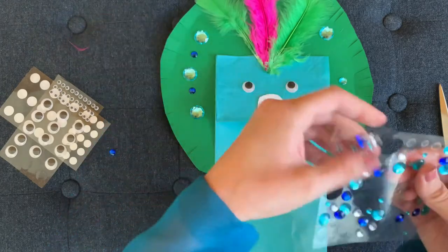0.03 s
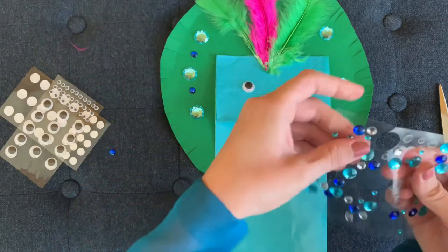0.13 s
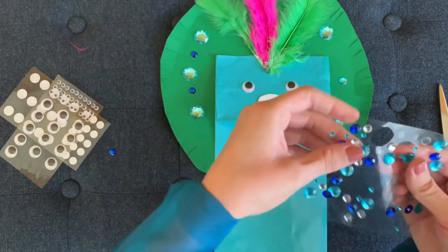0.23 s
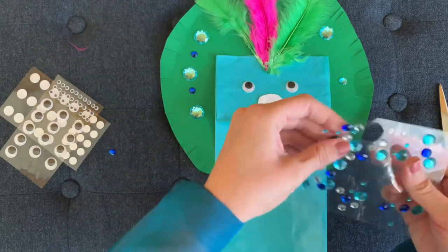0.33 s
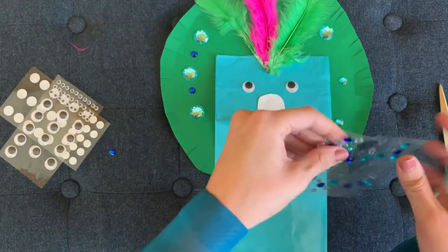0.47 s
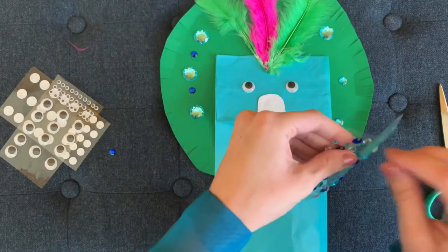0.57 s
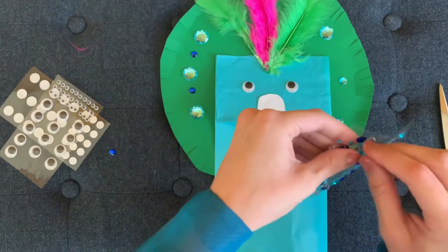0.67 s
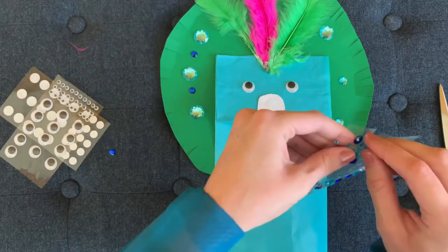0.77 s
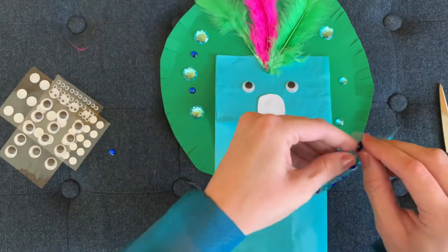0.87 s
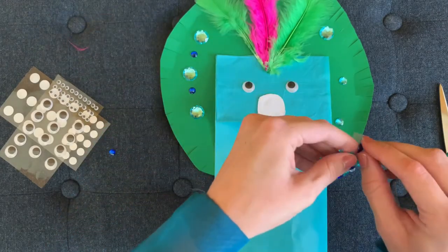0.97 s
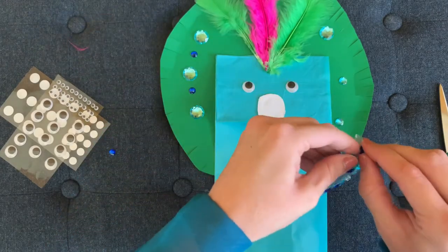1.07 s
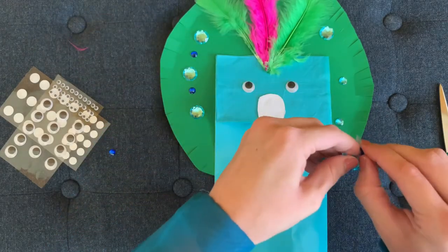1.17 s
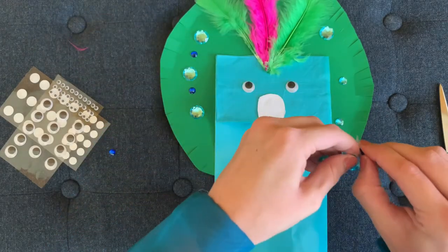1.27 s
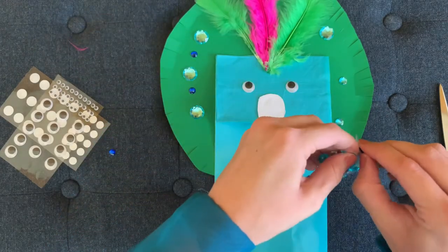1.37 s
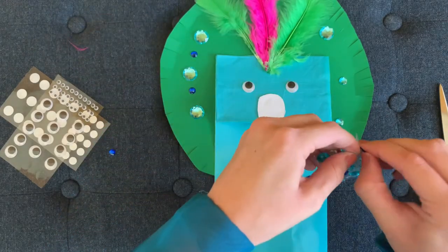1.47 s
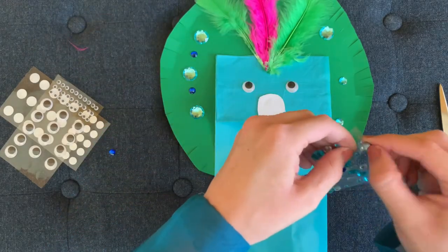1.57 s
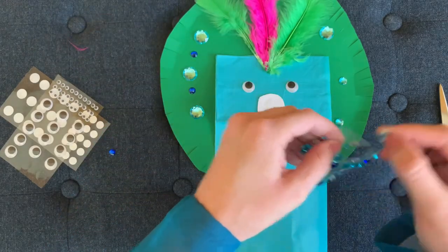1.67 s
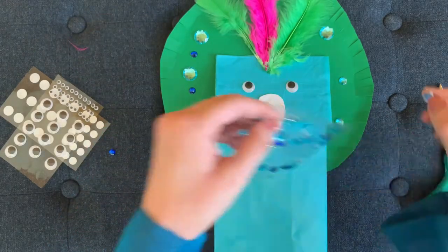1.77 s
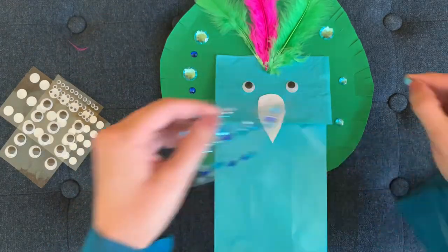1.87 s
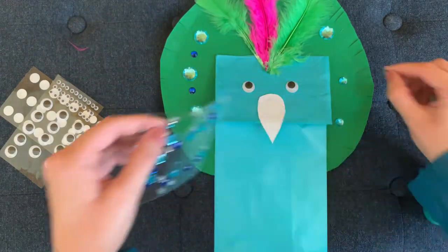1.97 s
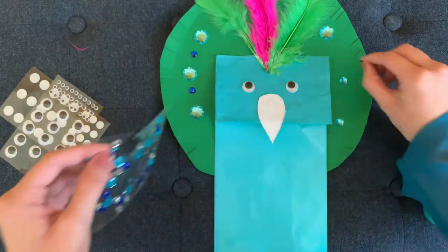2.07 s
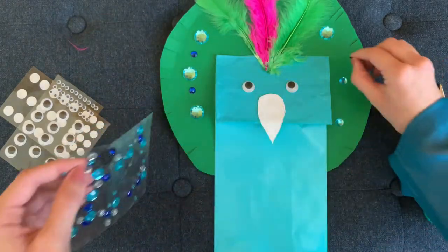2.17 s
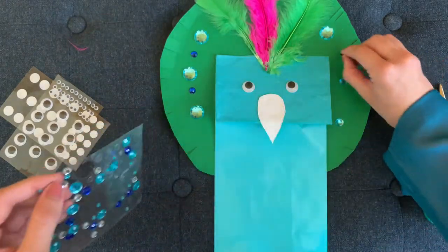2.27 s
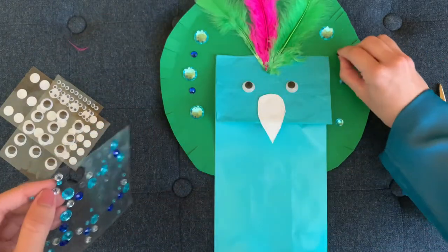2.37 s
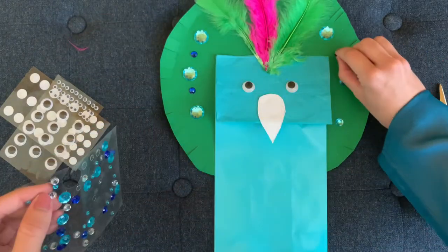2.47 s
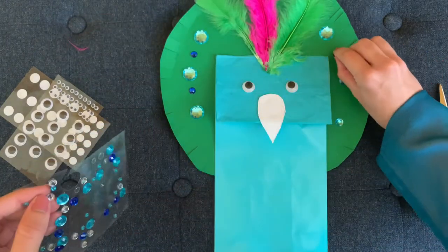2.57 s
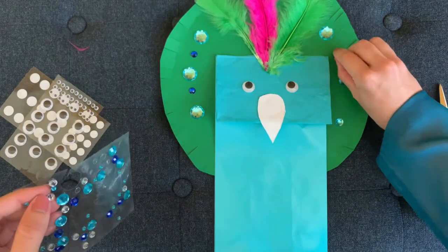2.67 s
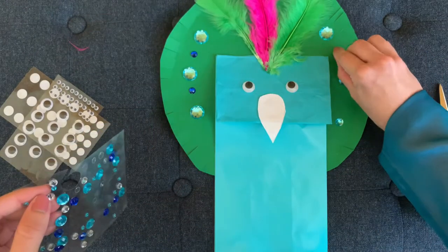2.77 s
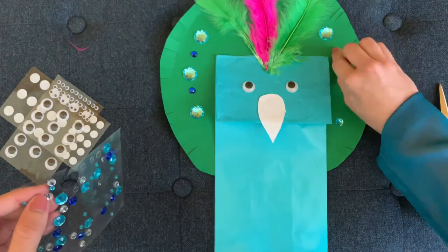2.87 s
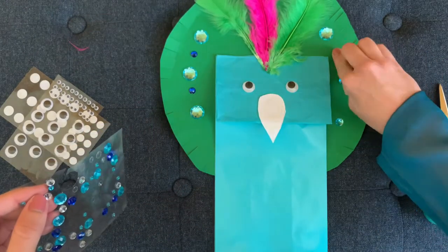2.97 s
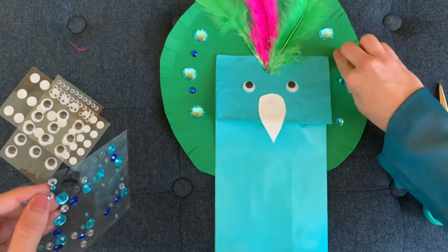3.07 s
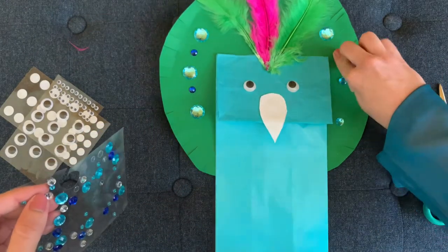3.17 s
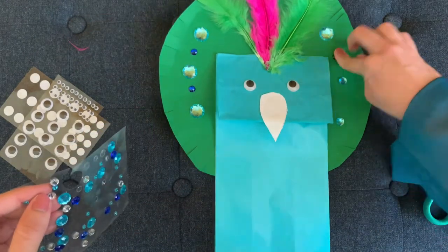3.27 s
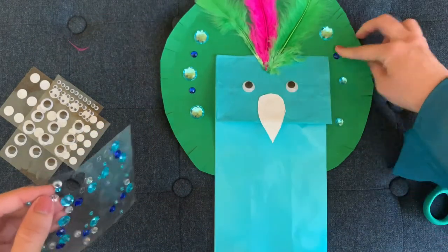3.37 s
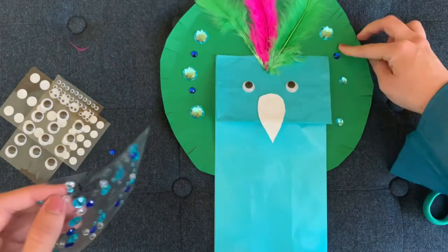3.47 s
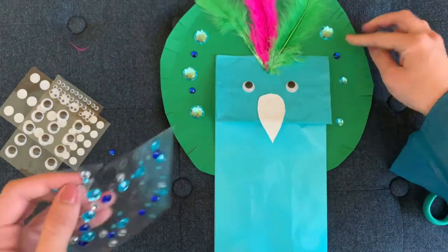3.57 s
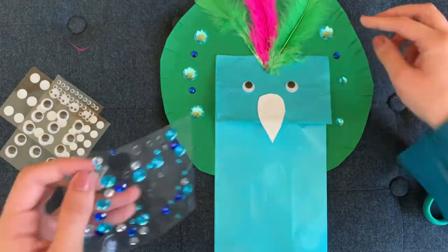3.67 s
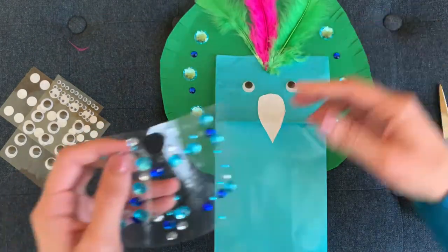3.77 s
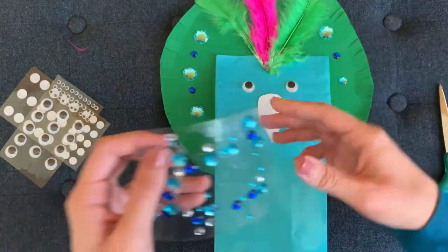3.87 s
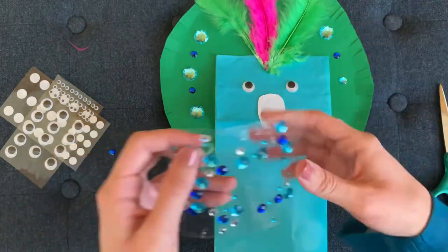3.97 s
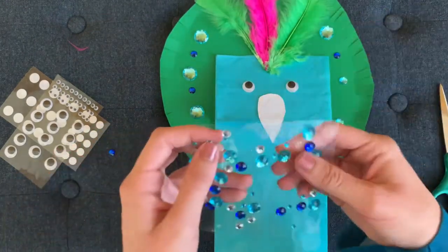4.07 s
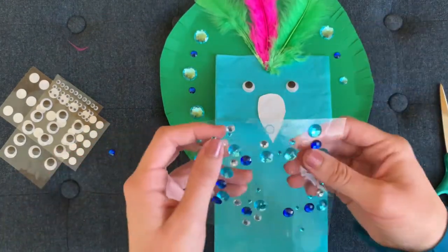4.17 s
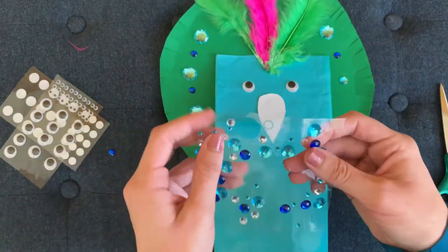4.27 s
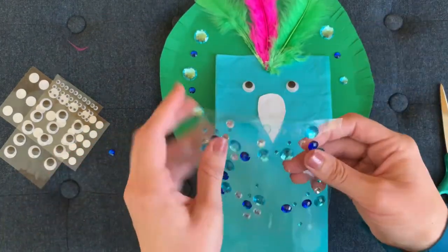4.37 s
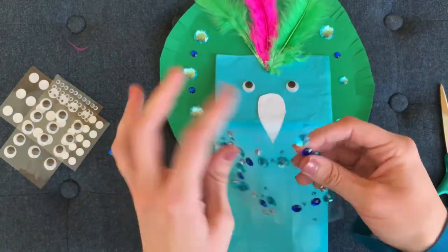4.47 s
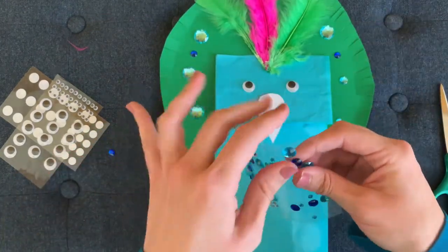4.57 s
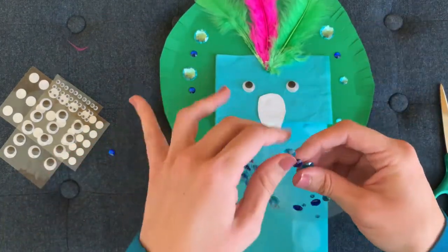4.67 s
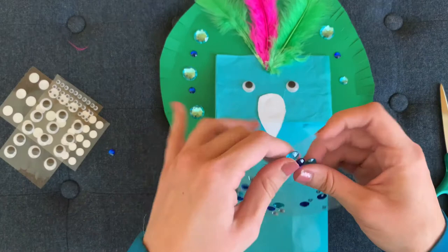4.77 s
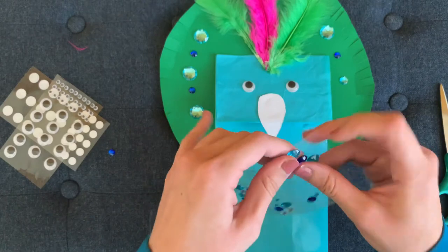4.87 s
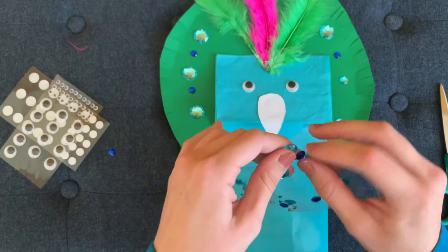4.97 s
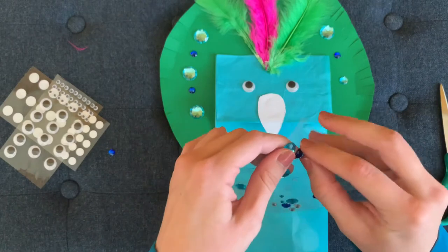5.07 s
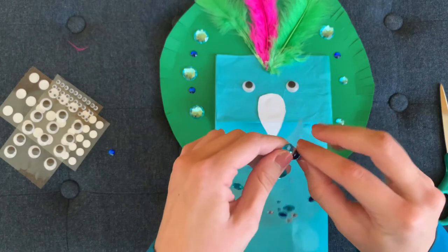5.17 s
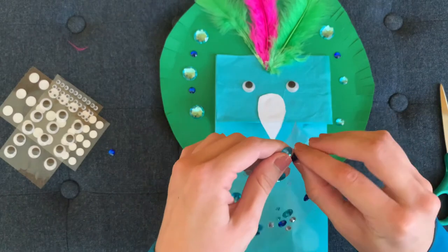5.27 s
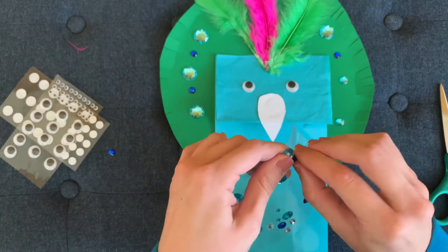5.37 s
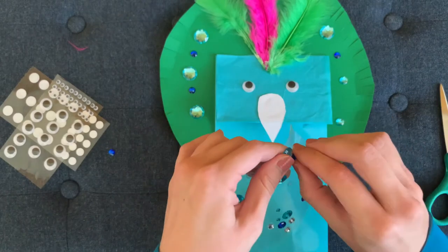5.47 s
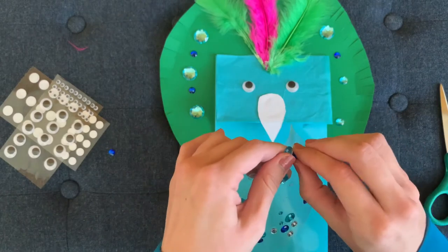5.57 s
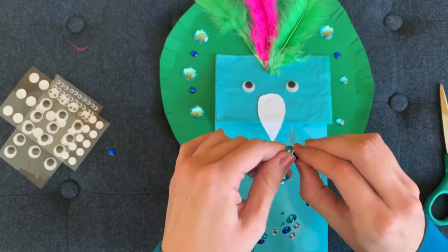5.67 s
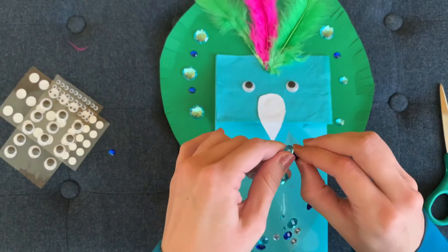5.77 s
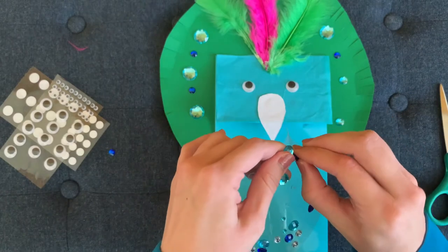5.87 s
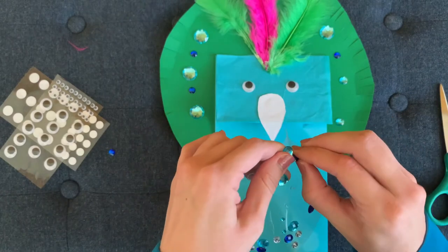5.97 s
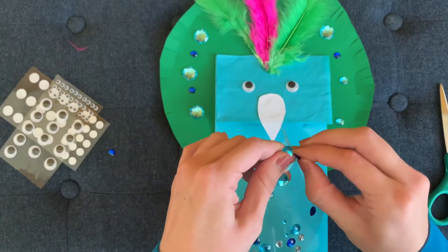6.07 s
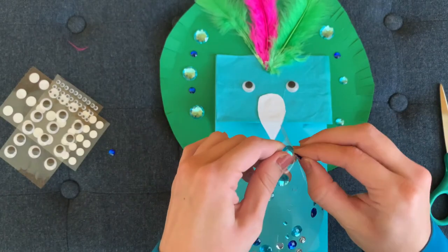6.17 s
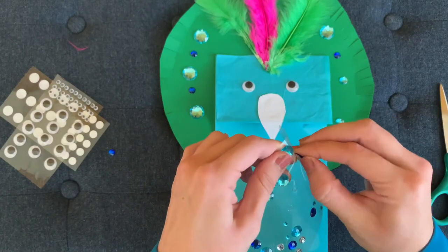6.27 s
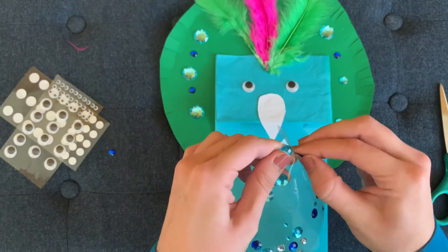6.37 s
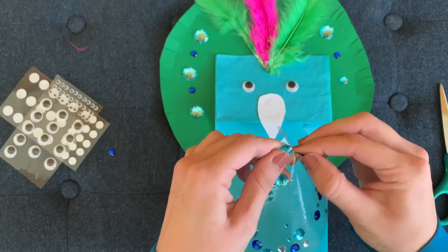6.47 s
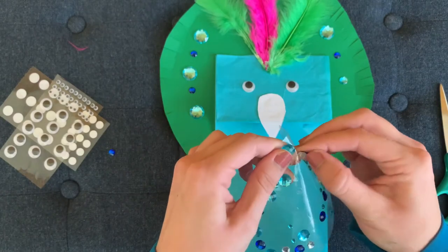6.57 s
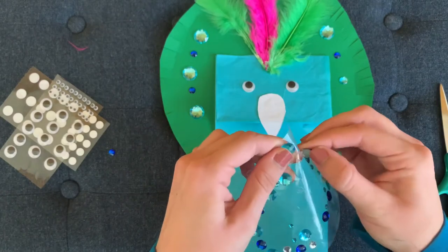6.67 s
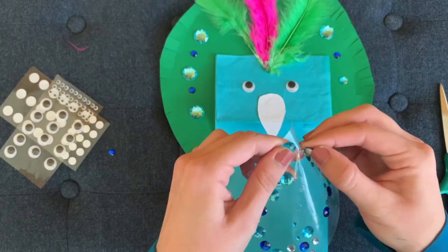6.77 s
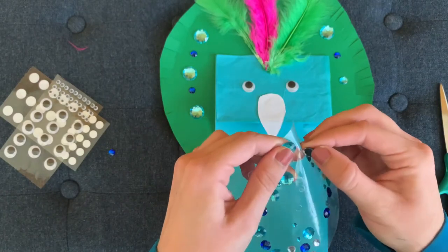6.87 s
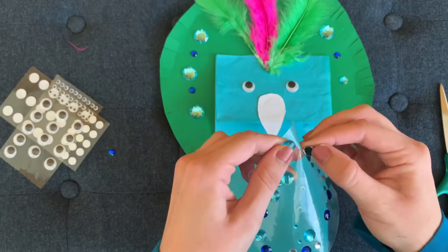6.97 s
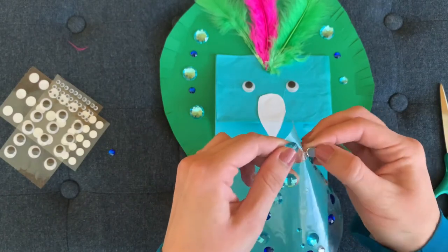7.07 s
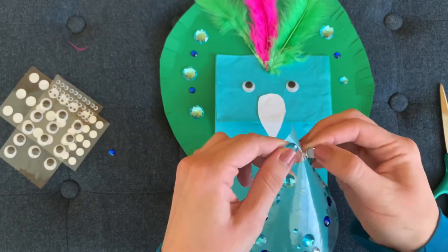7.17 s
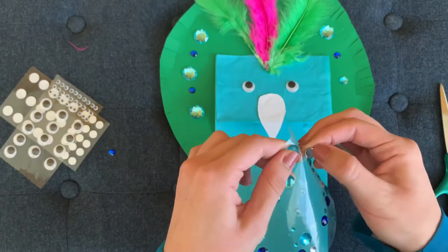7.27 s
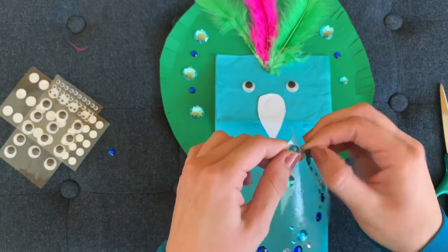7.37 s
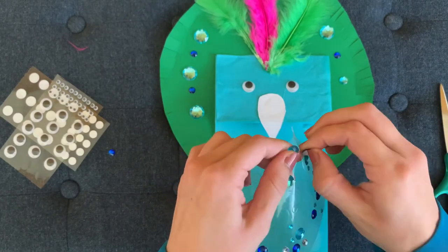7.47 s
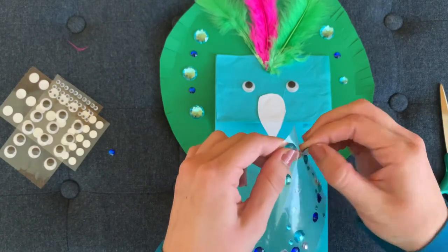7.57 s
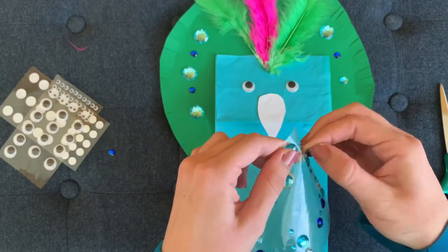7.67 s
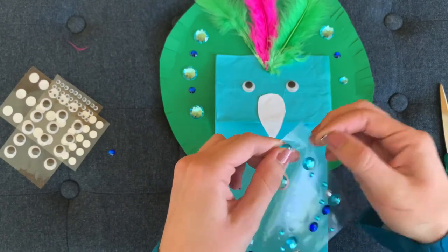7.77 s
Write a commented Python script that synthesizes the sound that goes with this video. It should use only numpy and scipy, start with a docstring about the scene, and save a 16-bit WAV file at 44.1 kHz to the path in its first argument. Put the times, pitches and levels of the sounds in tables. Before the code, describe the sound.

Very close handling in a small, quiet, nearly dry room, with dull sleeve rumble, faint low mains hum and slight hiss. At once a thin plastic sheet buckles in a tight burst of crisp snaps, with more crackles at 0.3-0.5 s. Small nail ticks follow, sharpest around 1.1 and 1.5-1.6 s. A soft airy sleeve swish passes near 2 s. From 2.4 to 3.7 s it is very quiet: dull hand brushes and muted taps on paper, clearest at 2.8 s. Light plastic ticks return at 4-4.4 s, then a lively crackling cluster at 4.9-5.3 s, strongest near 5.15. Faint picking and sticky scratching grow from 5.9 s into bright clicks at 6.5-6.6 s, then sparse ticks. Hard snaps at 7.7 s lead to the loudest, a double-flicked gem pop with a tiny glassy ring at 7.8 s.

```python
"""A thin plastic sheet of adhesive gems snaps and crinkles as fingers bend it over a padded seat.
A gem is tapped onto paper, then nails pick at the next one until it pops off its glue and rings.
Snaps are filtered noise bursts, strokes are clumped stick-slips, and the gem is a set of decaying modes.
Sleeves rustle dully and the mains hum faintly in a small quiet room, heard from close by in mono
and spread to two channels by a phone's stereo widening."""
import sys
import numpy as np
from scipy import signal
from scipy.fft import rfft, irfft, next_fast_len
from scipy.io import wavfile

SR = 44100
rng = np.random.default_rng(int(sys.argv[2]) if len(sys.argv) > 2 else 0)


def bounce(signal):
    """Save signal as a 16-bit WAV file at the path given by the first command-line argument."""
    frames = np.transpose(np.atleast_2d(signal))
    limited = np.clip(frames, -1, 1)
    pcm = np.round(limited * 32767).astype(np.int16)
    wavfile.write(sys.argv[1], SR, pcm)


N = 344862
TIME = np.arange(N) / SR
HZ = np.fft.rfftfreq(4096, 1 / SR)  # frequencies at which filter gains are given


def from_db(db):
    """Decibels to gain."""
    return 10 ** (np.asarray(db) / 20)


def rms_one(x):
    """Scale to unit rms."""
    return x / np.sqrt(np.mean(x ** 2) + 1e-20)


def at_hz(points, hz):
    """Read a table on a log-frequency axis."""
    points = np.array(points)
    return np.interp(np.log(np.maximum(hz, 1)), np.log(points[:, 0]), points[:, 1])


def along(points, axis):
    """Read a two-column table on a linear axis, straight between its points."""
    return np.interp(axis, *np.transpose(points))


def causal_filter(x, gain_db, size=4096):
    """Minimum-phase filter shaped by these gains over HZ; white noise keeps its power."""
    # folding the cepstrum onto positive time gives minimum phase
    cepstrum = irfft(np.log(from_db(gain_db)))
    cepstrum[1:size // 2] *= 2
    cepstrum[size // 2 + 1:] = 0
    response = irfft(np.exp(rfft(cepstrum)))
    return signal.fftconvolve(x, response / np.linalg.norm(response))[:len(x)]


def colour(x, spectrum):
    """Filter by a table of (pitch_hz, relative level_db)."""
    return causal_filter(x, at_hz(spectrum, HZ))


def coloured_noise(spectrum):
    """Steady noise over the whole scene, in this colour."""
    return colour(rng.standard_normal(N), spectrum)


def wander(axis):
    """Smooth chance around zero: a new normal draw at each unit of the axis, joined by lines."""
    knots = rng.standard_normal(int(axis[-1]) + 2)
    return np.interp(axis, np.arange(len(knots)), knots)


def drift(rate):
    """Slow chance over the whole scene, with this many turns a second."""
    return wander(TIME * rate)


def add(track, s, sound):
    """Mix a sound in at time s."""
    at = round(s * SR)
    track[at:at + len(sound)] += sound[:N - at]


# sleeves and room rumble, before the 2 dB lift and the lumps: time_s, level_db
RUMBLE_LEVEL = [(0.0, -61), (0.23, -62.5), (0.77, -69), (1.69, -65.5), (2.14, -67), (2.42, -67.5),
                (3.19, -64), (3.75, -70.5), (4.14, -64), (4.76, -70), (4.97, -63.5), (5.15, -63.5),
                (5.53, -71.5), (5.9, -68), (6.11, -72), (6.73, -66), (7.08, -71.5), (7.7, -66)]
# colour of the rumble: pitch_hz, relative level_db (per Hz)
RUMBLE_COLOUR = [(20, -30), (45, -11), (75, -4.5), (110, -3.5), (200, 0.5), (290, -5), (420, -11),
                 (600, -21), (900, -26), (2000, -38.5)]
# colour of the steady hiss: pitch_hz, relative level_db (per Hz)
HISS_COLOUR = [(200, 0), (700, -21.5), (1500, 1), (3000, 5), (6000, 1.5), (12000, -3), (16000, -8)]
# partials of the mains hum, before drift and swell: pitch_hz, level_db
HUM_PARTIALS = [(59, -64.5), (119.8, -72.5), (239.6, -73)]
# slow swelling and sinking of the low hum: time_s, level_db
HUM_SWELL = [(0, 0), (0.9, -5), (2.8, 0), (3.8, 1.5), (5.6, -1.5), (6.4, -3), (7.82, -5)]


def background(hiss_db=-81.5, drone_db=-67.5):
    """Dull, lumpy sleeve and room rumble, wavering mains hum with a building drone, and faint hiss."""
    rumble_db = along(RUMBLE_LEVEL, TIME) + 3.5 * drift(14)
    rumble = from_db(rumble_db + 2.0) * coloured_noise(RUMBLE_COLOUR)
    hum = np.zeros(N)
    for hz, db in HUM_PARTIALS:
        level = from_db(db + 2 * drift(2.8)) * np.sqrt(2)  # rms to peak
        hum += level * np.sin(2 * np.pi * hz * TIME + .45 * drift(7.6))
    # a deep drone of the building goes with the hum
    drone_colour = [(20, -26.5), (50, -3.0), (75, -3.5), (130, -12), (400, -49.5)]
    drone = from_db(drone_db) * coloured_noise(drone_colour)
    swell = from_db(along(HUM_SWELL, TIME))
    hiss = from_db(hiss_db) * coloured_noise(HISS_COLOUR)
    return rumble + swell * (hum + drone) + hiss


# slack in the grip; held loosely the whole sheet thuds, pinched tight it hardly does:
# time_s, level_db (thud against flex)
GRIP_SLACK = [(0, -2), (0.6, 1.5), (1.1, -6.5), (1.65, -10.5), (2.7, 1.5), (4.1, 0.5), (4.9, -10.5),
              (7.3, -17.5), (7.67, -3)]


def slack_db(s):
    """How freely the sheet can move at time s."""
    return along(GRIP_SLACK, s)


# the sheet's three registers, each: pitch_hz, relative level_db (per Hz)
# thud of the whole sheet
THUD_COLOUR = [(150, -23), (260, -0.5), (380, 3.5), (480, 3.5), (700, -6), (950, -5.5), (1500, -42)]
# bending flex
FLEX_COLOUR = [(450, -24.5), (800, -12), (1050, 0), (1900, 0.5), (2800, -3.5), (4200, -4.5), (5500, -24.5),
               (9000, -42)]
# sharp crack
CRACK_COLOUR = [(2500, -37), (4300, 5), (6200, 0), (8000, 1.5), (10500, 1.5), (13000, -6), (15300, -1.5),
                (17000, -2.5)]


def sheet_colours(flex_db, crack_db, ring_hz, ring_db=7, overtone_db=2, sharpness=7, ripple_db=3.5):
    """Thud, flex and crack spectra for one grip: two main resonances, and ripples that shift every time."""
    thud = at_hz(THUD_COLOUR, HZ) + ripple_db * wander(HZ / 70)
    # weaker than the ring, the second mode lies a little less than a tritone above it
    ringing = 0
    for hz, db in [(ring_hz, ring_db), (1.4 * ring_hz, overtone_db)]:
        detuning = 1.1 * sharpness * np.log(np.maximum(HZ, 1) / hz)
        ringing = ringing + from_db(db) ** 2 / (1 + detuning ** 2) ** 2
    flex_power = from_db(at_hz(FLEX_COLOUR, HZ)) ** 2 + ringing
    flex = 10 * np.log10(flex_power) + 1.2 * ripple_db * wander(HZ / 190)
    # soft bends lose their top octaves, hard nail contacts keep them
    tilt_db_per_octave = np.clip(.7 * (crack_db - flex_db - 8), -16, 1.5)
    octaves = np.log2(np.maximum(HZ / 5000, 1))
    crack = at_hz(CRACK_COLOUR, HZ) + tilt_db_per_octave * octaves + ripple_db * wander(HZ / 400)
    # the softest bends also lose the upper flex modes
    dulling_db_per_octave = np.clip(.5 * (flex_db - crack_db - 5.0), 0, 8)
    flex = flex - dulling_db_per_octave * np.log2(np.maximum(HZ / 1300, 1))
    return thud, flex, crack


def crinkle(t, gain_db, per_s, spread_db, smooth, flicker_db, size=16384):
    """Tiny stick-slips of uneven size in clumps, over smooth friction; rms 1."""
    size_db = spread_db * np.minimum(rng.exponential(1, size), 3)
    sizes = from_db(size_db) * rng.choice([-1, 1], size)
    slips = rms_one(sizes * (rng.random(size) < per_s / SR))
    friction = smooth * rng.standard_normal(size)
    clumps = from_db(flicker_db * wander(TIME[:size] * 170))
    rubbing = np.resize((slips + friction) * clumps, len(t))
    return rms_one(causal_filter(rubbing, gain_db))


# fingers bend and rub the sheet or the paper: peak_s, length_s, flex_db, crack_db, ring_hz
BENDS = [(0.006, 0.045, -37.5, -44, 1350), (0.047, 0.07, -38, -55, 2140), (0.305, 0.082, -47, -50.5, 3730),
         (0.417, 0.11, -47.5, -70, 1726), (0.714, 0.076, -65, -60.5, 1094), (1.634, 0.039, -48.5, -54, 924),
         (3.22, 0.05, -63.5, -90, 1100), (3.342, 0.12, -66.5, -64.5, 1076), (3.473, 0.09, -65, -66, 990),
         (4.08, 0.083, -52.5, -53, 1020), (4.329, 0.08, -51, -50.5, 2190),
         (4.772, 0.06, -61.5, -63.5, 1010), (4.893, 0.07, -47.5, -52.5, 4330),
         (4.945, 0.035, -53, -52.5, 2400), (5.009, 0.11, -51.5, -52, 2100),
         (5.064, 0.074, -57.5, -55.5, 980), (5.122, 0.07, -48, -47.5, 1800),
         (5.296, 0.065, -57.5, -59.5, 2350), (5.375, 0.04, -66.5, -67, 1947),
         (6.748, 0.055, -67, -72, 2690), (6.929, 0.066, -69.5, -74, 2650),
         (7.134, 0.09, -61.5, -70.5, 2660), (7.74, 0.065, -39, -40.5, 1690),
         (7.781, 0.06, -34.5, -46.5, 1497), (7.81, 0.055, -34.5, -35, 1515)]
# a nail scratches under a gem and its glue peels: peak_s, length_s, crack_db
PEELS = [(0.773, 0.08, -70), (1.138, 0.11, -54.5), (1.502, 0.065, -47.5), (3.645, 0.072, -66),
         (4.294, 0.11, -46), (4.419, 0.08, -65.5), (4.679, 0.25, -69.5), (5.91, 0.19, -62.5),
         (6.273, 0.27, -58), (6.544, 0.085, -46), (6.59, 0.064, -38.5)]
PEEL_FLEX_DB, PEEL_RING_HZ = -9, 4100  # flex against crack
# hand and sleeve brush dully over paper and seat: peak_s, length_s, thud_db
BRUSHES = [(0.184, 0.062, -56.5), (0.484, 0.075, -53), (2.509, 0.24, -62.5), (2.816, 0.11, -54.5),
           (2.912, 0.13, -56.5), (4.076, 0.09, -52.5)]
BRUSH_FLEX_DB, BRUSH_CRACK_DB, BRUSH_RING_HZ = -25.5, -20, 900  # levels against thud
# crinkling swells just before each handling snap, peaks with it and fades: levels against the snap
SHUDDER_FLEX_DB, SHUDDER_CRACK_DB, SHUDDER_RISE_S, SHUDDER_FADE_S = -20, -20, 0.014, 0.06
SWELL_SHARE = 0.46  # part of a bend, peel or brush spent swelling


def finger_strokes():
    """All strokes as (peak_s, swell_s, fade_s, thud_db, flex_db, crack_db, ring_hz)."""
    def timing(peak, length_s):
        return peak, SWELL_SHARE * length_s, (1 - SWELL_SHARE) * length_s

    def gripped(s, flex_db):
        return flex_db + slack_db(s), flex_db

    rows = []
    for s, length_s, flex_db, crack_db, hz in BENDS:
        rows.append((*timing(s, length_s), *gripped(s, flex_db), crack_db, hz))
    for s, length_s, db in PEELS:
        rows.append((*timing(s, length_s), *gripped(s, db + PEEL_FLEX_DB), db, PEEL_RING_HZ))
    for s, length_s, db in BRUSHES:
        rows.append((*timing(s, length_s), db, db + BRUSH_FLEX_DB, db + BRUSH_CRACK_DB, BRUSH_RING_HZ))
    for s, flex_db, crack_db, hz in handling_snaps():
        levels = *gripped(s, flex_db + SHUDDER_FLEX_DB), crack_db + SHUDDER_CRACK_DB
        rows.append((s, SHUDDER_RISE_S, SHUDDER_FADE_S, *levels, hz))
    return rows


def strokes():
    """Each stroke swells to its peak and eases off, driving the three registers."""
    out = np.zeros(N)
    for peak, swell_s, fade_s, thud_db, flex_db, crack_db, ring_hz in finger_strokes():
        start, end = peak - max(swell_s, .006), peak + max(fade_s, .015)
        t = TIME[(TIME > start) & (TIME < end)]
        force = np.interp(t, [start, peak, end], [0, 1, 0]) ** 1.25
        thud, flex, crack = sheet_colours(flex_db, crack_db, ring_hz)
        sound = from_db(thud_db) * crinkle(t, thud, per_s=500, spread_db=0, smooth=0.74, flicker_db=-0.5)
        sound += from_db(flex_db) * crinkle(t, flex, per_s=510, spread_db=2.5, smooth=0.47, flicker_db=5.5)
        sound += from_db(crack_db) * crinkle(t, crack, per_s=880, spread_db=4.0, smooth=1.0, flicker_db=7.0)
        add(out, t[0], force * sound)
    return out


def give_way(gain_db, rise_s=0.001, size=256):
    """Friction that swells for a millisecond or two as the film starts to yield."""
    swell = np.exp((np.arange(size) - size) / SR / rise_s)
    return swell * rms_one(causal_filter(rng.standard_normal(size), gain_db))


def burst(gain_db, decay_s, spike, size=4096):
    """One sudden slip in a quickly dying flutter; its energy is that of rms 1 over 4 ms."""
    flutter = rng.standard_normal(size) * np.exp(-np.arange(size) / SR / decay_s)
    flutter /= np.linalg.norm(flutter)
    flutter[14] += spike  # the slip, 0.3 ms in
    sound = causal_filter(flutter, gain_db)
    return sound / np.linalg.norm(sound) * np.sqrt(.004 * SR)


# the sheet buckles and its free part rings: start_s, flex_db, crack_db, ring_hz
BUCKLES = [(0.0242, -36, -53.5, 1640), (0.0323, -27, -43, 2820), (0.0394, -26.5, -26.5, 4260),
           (0.0509, -30.5, -41, 1560), (0.2699, -46.5, -41.5, 3640), (0.2932, -29, -36, 3640),
           (0.3033, -34.5, -36, 1810), (0.3865, -32, -52, 2360), (0.4, -45, -51.5, 1260),
           (0.4716, -44.5, -66.5, 2010), (0.7178, -55, -69, 1280), (1.5061, -44, -28.5, 4020),
           (1.6314, -40, -44.5, 1004), (4.083, -46, -52, 1040), (4.324, -58, -52, 2250),
           (4.8831, -40, -40, 4240), (4.941, -47, -52, 2370), (5.0081, -46.5, -43.5, 4300),
           (5.064, -53.5, -68.5, 1030), (5.1381, -28, -34, 2000), (5.1612, -36, -43.5, 1850),
           (5.2313, -55, -65, 1190), (5.2735, -49.5, -66, 998), (7.3571, -58, -69, 1394),
           (7.6698, -30.5, -28.5, 2190), (7.738, -36, -39, 1630), (7.7429, -33.5, -32, 1630),
           (7.7614, -31.5, -50.5, 2800), (7.7955, -24, -18.5, 1620)]
# a nail catches on the rim of a gem: start_s, crack_db, ring_hz
NAIL_TICKS = [(0.646, -55, 4400), (0.851, -59.5, 2920), (1.1344, -34, 2990), (1.232, -42.5, 4300),
              (1.3918, -60.5, 2305), (1.4884, -29.5, 1860), (1.6016, -38, 1920), (4.0094, -54.5, 4320),
              (4.28, -47, 4380), (5.8864, -49, 3980), (5.911, -50, 1450), (5.9689, -55, 1410),
              (6.0791, -41, 1470), (6.2638, -45, 4370), (6.2817, -36.5, 2020), (6.419, -38.5, 2480),
              (6.452, -46, 4400), (6.51, -48.5, 2020), (6.5442, -32, 4340), (6.5896, -31.5, 4400),
              (6.5985, -35, 4440), (7.0177, -41.5, 3970), (7.267, -54, 2510), (7.3761, -53, 1243),
              (7.3997, -49.5, 4140), (7.7268, -32, 3660), (7.7763, -30.5, 1150)]
TICK_FLEX_DB = -13.5  # a tick bends the sheet this much less than it cracks
# the gem is set down and tapped onto the paper: start_s, flex_db (the knock), crack_db, ring_hz
PAPER_TAPS = [(2.3952, -66.5, -71.5, 1300), (2.7791, -46, -54.5, 960), (2.7918, -49, -59, 925),
              (2.8948, -55, -79, 1140), (3.24, -62.5, -59.5, 1110), (3.3742, -65.5, -55.5, 1290),
              (3.4899, -61, -61, 1060), (3.658, -70, -70, 1380)]


def handling_snaps():
    """Buckles, nail ticks and taps as (start_s, flex_db, crack_db, ring_hz)."""
    ticks = [(s, db + TICK_FLEX_DB, db, hz) for s, db, hz in NAIL_TICKS]
    return BUCKLES + ticks + PAPER_TAPS


def glue_threads(count=4, thread_db=-1, spread_db=3.5, edge_db=-9.5):
    """Glue threads part at random in each peel, on average loudest in its middle, each a faint tick."""
    rows = []
    for peak, length_s, db in PEELS:
        progress = (np.arange(count) + rng.random(count)) / count
        times = peak + length_s * (progress - SWELL_SHARE)
        scatter_db = spread_db * rng.standard_normal(count)
        levels = db + thread_db + scatter_db + edge_db * (2 * progress - 1) ** 2
        for s, crack_db in zip(times, levels):
            rows.append((s, crack_db + PEEL_FLEX_DB, crack_db, PEEL_RING_HZ))
    return rows


def snaps():
    """Each snap yields, cracks briefly, rings longer in the bending waves and nudges the whole sheet."""
    out = np.zeros(N)
    for s, flex_db, crack_db, ring_hz in handling_snaps() + glue_threads():
        thud, flex, crack = sheet_colours(flex_db, crack_db, ring_hz)
        lead_in = from_db(crack_db - 10.5) * give_way(crack) + from_db(flex_db - 3.5) * give_way(flex)
        add(out, s - len(lead_in) / SR, lead_in)
        add(out, s, from_db(crack_db) * burst(crack, decay_s=0.0013, spike=0.46))
        add(out, s, from_db(flex_db) * burst(flex, decay_s=0.0031, spike=0.21))
        # a contact that rings low moves more mass, so it thuds more
        weight_db = 12 * np.clip(np.log2(1800 / ring_hz), 0, 1)
        add(out, s, from_db(flex_db + weight_db - 20.5) * burst(thud, decay_s=0.008, spike=0.96))
        # the film shivers on for a moment, its flex less so when pinched tight
        add(out, s, from_db(crack_db - 14) * burst(crack, decay_s=.011, spike=0))
        shiver_db = flex_db - 8.5 + 0.54 * slack_db(s)
        add(out, s, from_db(shiver_db) * burst(flex, decay_s=0.017, spike=0))
    return out


# a sleeve swishes as the arm reaches across: time_s, level_db
SWISH_LEVEL = [(1.7, -96.5), (1.92, -72), (2.06, -67.5), (2.13, -77), (2.3, -98)]
# colour of the swish: pitch_hz, relative level_db (per Hz)
SWISH_COLOUR = [(600, -25.5), (1500, -13.5), (3500, 1), (6000, -1.5), (11000, -9.5), (16000, -11.5)]


def sleeve_swish():
    """Cloth slides smoothly over the seat: coloured noise under a slowly drawn level."""
    level_db = along(SWISH_LEVEL, TIME) + 1.2 * drift(40)
    return from_db(level_db) * coloured_noise(SWISH_COLOUR)


# the freed gem flicks twice against the nail: start_s, level_db (added to each mode)
GEM_FLICKS = [(7.7955, 4), (7.7968, 1)]
# ring of gem and sheet, before the pitch scatter: pitch_hz, level_db, t60_s
GEM_MODES = [(1520, -28.5, 0.042), (2305, -32, 0.016), (8540, -9.5, 0.019), (9550, -6, 0.0042),
             (10600, -34, 0.0088), (12100, -14.5, 0.0081), (14500, -36, 0.0065)]


def gem_pop(size=2048):
    """The gem lets go of the glue and rings briefly in decaying modes."""
    out, t = np.zeros(N), np.arange(size) / SR
    for s, flick_db in GEM_FLICKS:
        for hz, mode_db, t60 in GEM_MODES:
            # each mode's pitch is scattered a little at every flick
            pitch_hz = hz * (1 + 0.04 * rng.standard_normal())
            level_db = flick_db + mode_db - 60 * t / t60
            add(out, s, from_db(level_db) * np.cos(2 * np.pi * pitch_hz * t))
    return out


# decay of the small room: pitch_hz, t60_s
ROOM_T60 = [(200, 0.17), (1500, 0.42), (6000, 0.23), (15000, 0.089)]


def room(x, gap_s=0.0022, size=16384):
    """Diffuse reflections as band-split decaying noise that dies soonest in the treble."""
    t, response = np.arange(size) / SR, 0
    edges = np.geomspace(100, 18000, 8)
    for low, high in zip(edges, edges[1:]):
        band_filter = signal.butter(2, [low, high], "band", fs=SR, output="sos")
        band = signal.sosfilt(band_filter, rng.standard_normal(size))
        t60 = at_hz(ROOM_T60, np.sqrt(low * high))
        response = response + band * from_db(-60 * t / t60)
    # silent for one gap, then fading in over another
    response = response * np.clip(t / gap_s - 1, 0, 1)
    response = colour(response, [(200, 13.5), (1500, 0.5), (5000, -5.5), (15000, -0.5)])
    return signal.fftconvolve(x, response / np.linalg.norm(response))[:N]


# the phone's stereo widening, phase lag of the right channel behind the left: pitch_hz, phase_radians
WIDENING_PHASE = [(0, 0), (400, -.1), (780, -1.2), (1100, 0), (1600, -.2), (2200, .6), (2700, 1.9),
                  (3400, 1.4), (4620, 3.14), (8900, 9.42), (13200, 15.7), (22050, 28.6)]


def widen(x):
    """Stereo widening: the right channel is the left with a frequency-dependent phase lag."""
    size = next_fast_len(N + 4096)
    lag = along(WIDENING_PHASE, np.fft.rfftfreq(size, 1 / SR))
    right = irfft(rfft(x, size) * np.exp(-1j * lag), size)[:N]
    return np.array([x, right])


def scene():
    """Close handling sounds, their room, and the background."""
    handling = snaps() + strokes() + gem_pop() + sleeve_swish()
    wet = from_db(-23) * room(handling)
    # a little of the room and the rumble has opposite sign in the two channels
    side = from_db(-19.5) * room(handling) + from_db(-71.5) * coloured_noise(RUMBLE_COLOUR)
    balance = from_db([[-.3], [.3]])  # left, right
    return widen(handling + wet + background()) * balance + side * [[1], [-1]]


def record(dry, cutoff_hz=16150):
    """Loud peaks are rounded off, the level comes down a little and the top is cut."""
    rounded = 0.76 * np.tanh(dry / 0.94)
    return signal.sosfilt(signal.ellip(10, .2, 80, cutoff_hz, fs=SR, output="sos"), rounded)


dry = scene()
out = record(dry)
bounce(out)
```